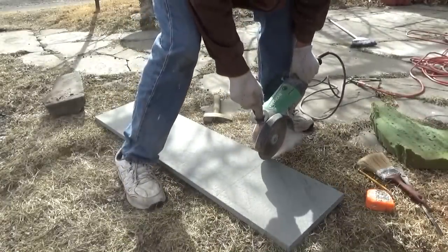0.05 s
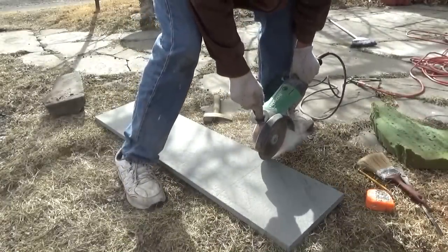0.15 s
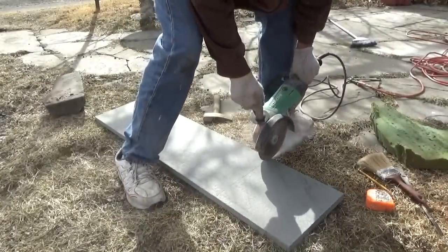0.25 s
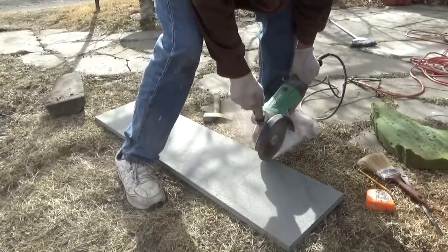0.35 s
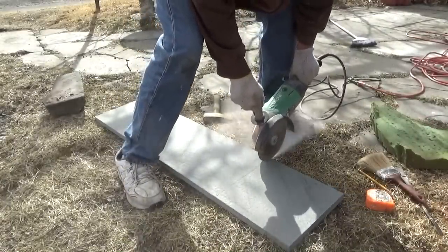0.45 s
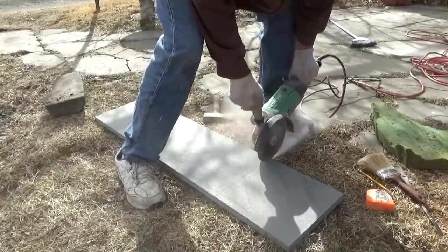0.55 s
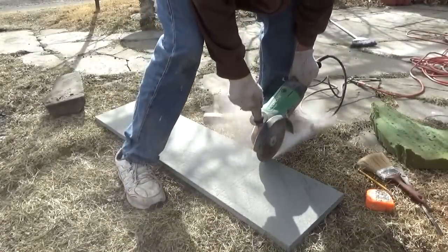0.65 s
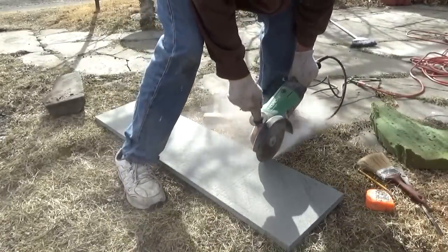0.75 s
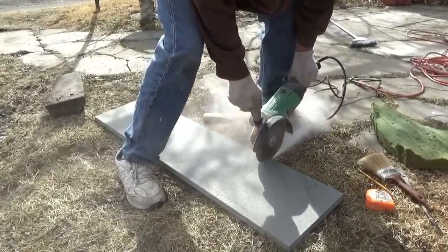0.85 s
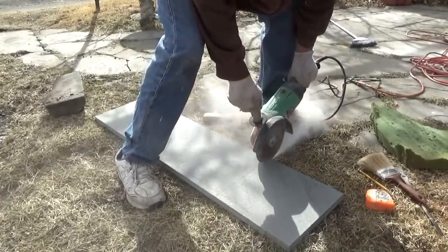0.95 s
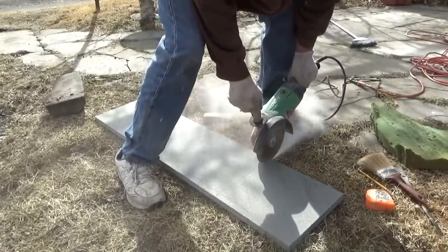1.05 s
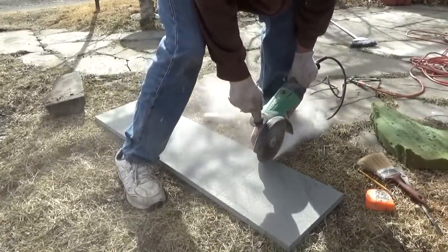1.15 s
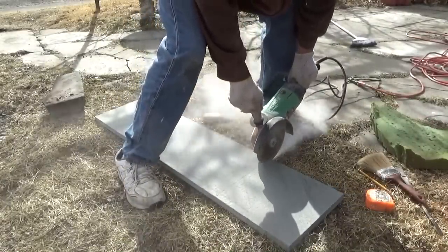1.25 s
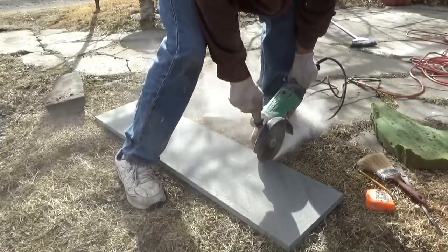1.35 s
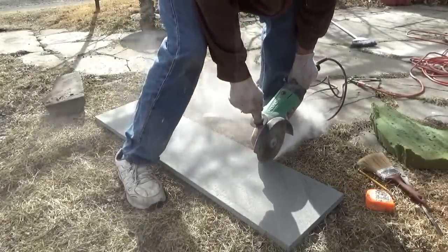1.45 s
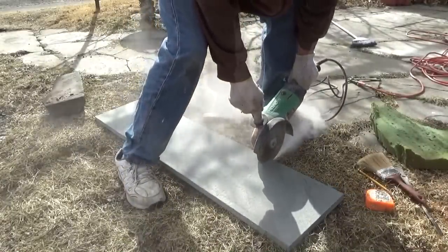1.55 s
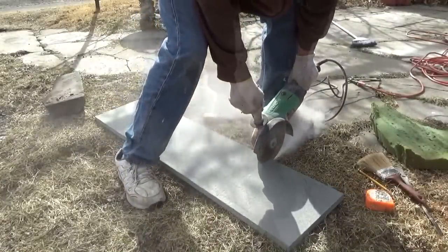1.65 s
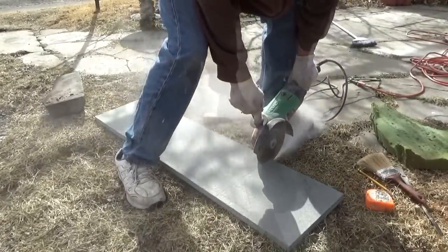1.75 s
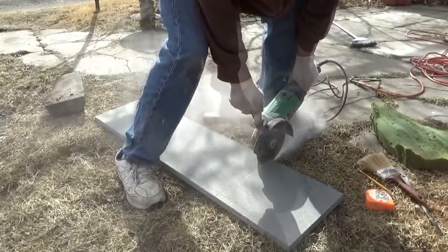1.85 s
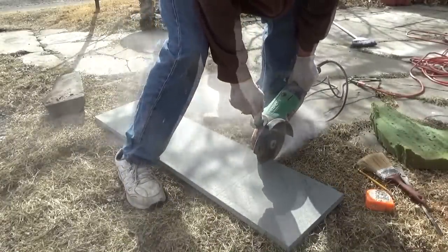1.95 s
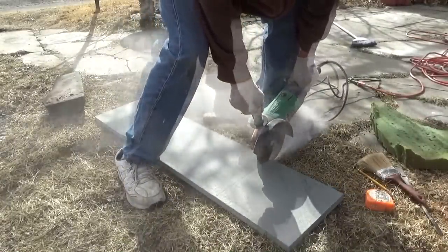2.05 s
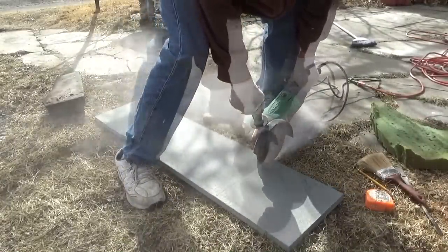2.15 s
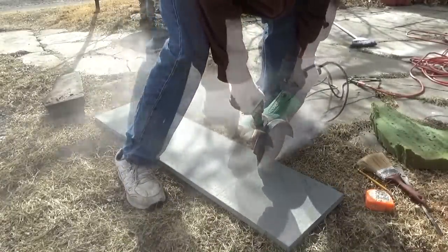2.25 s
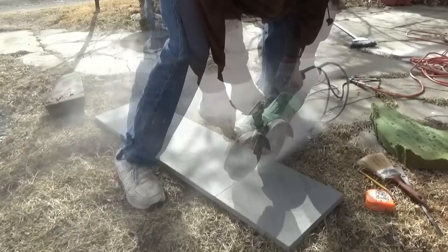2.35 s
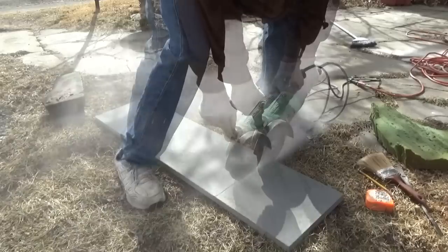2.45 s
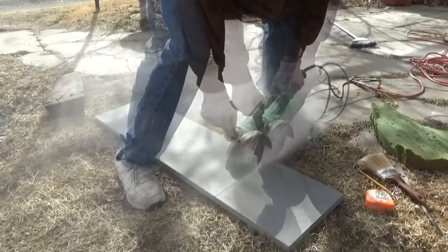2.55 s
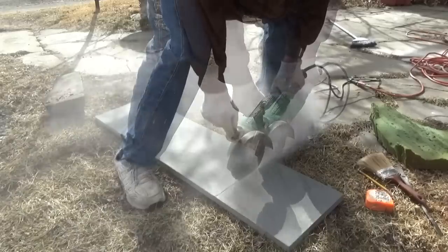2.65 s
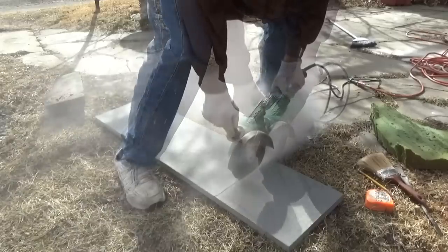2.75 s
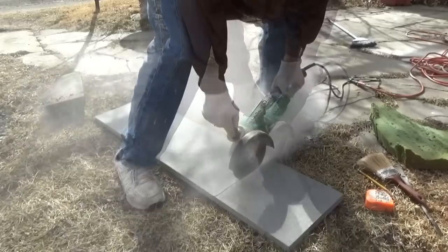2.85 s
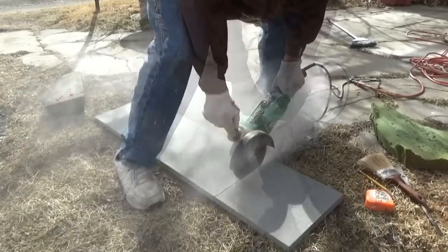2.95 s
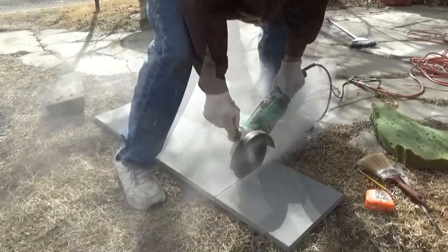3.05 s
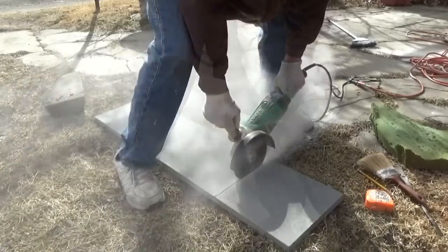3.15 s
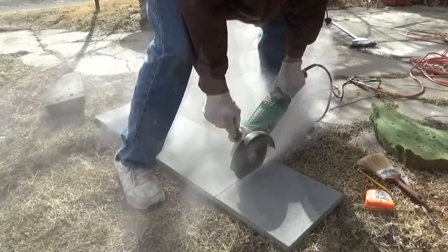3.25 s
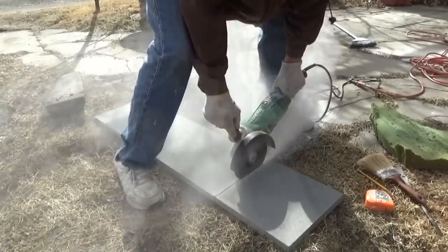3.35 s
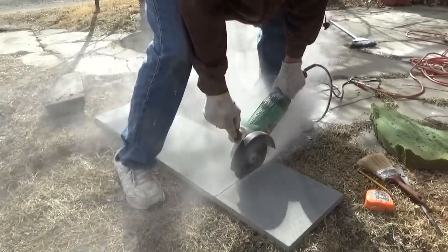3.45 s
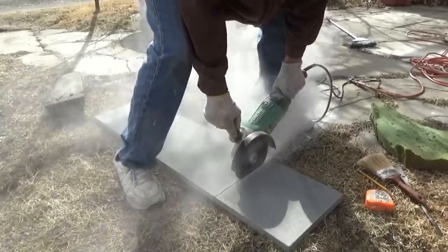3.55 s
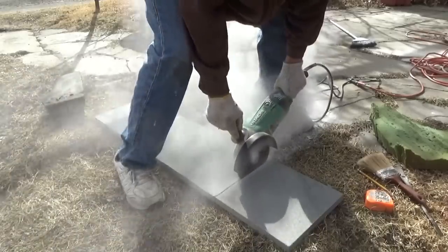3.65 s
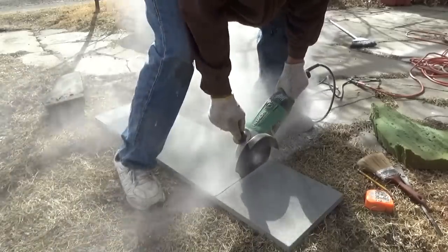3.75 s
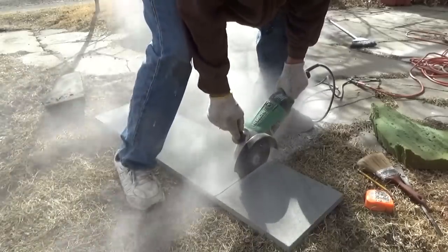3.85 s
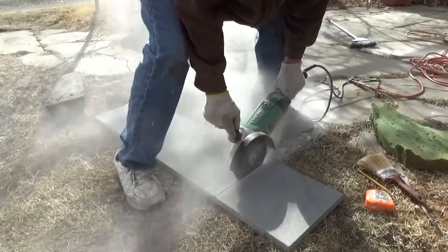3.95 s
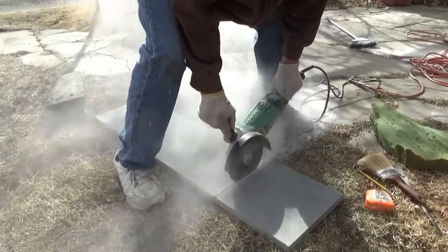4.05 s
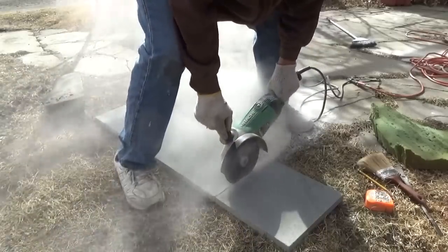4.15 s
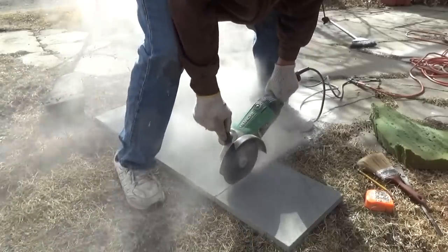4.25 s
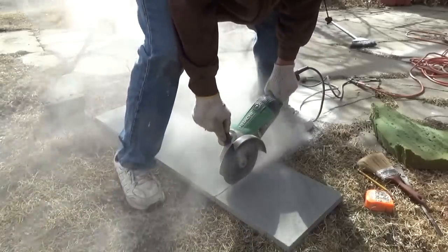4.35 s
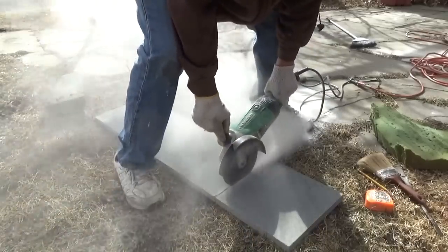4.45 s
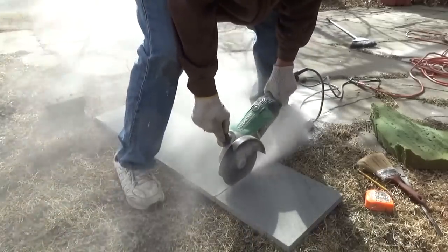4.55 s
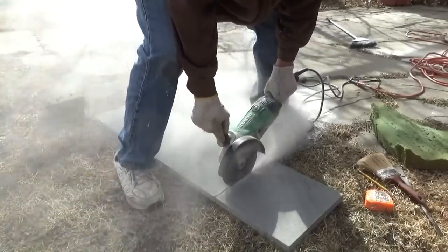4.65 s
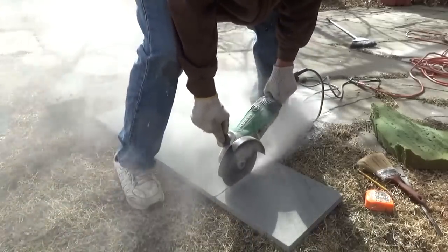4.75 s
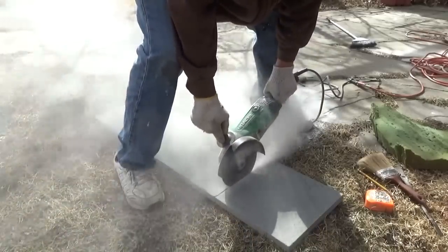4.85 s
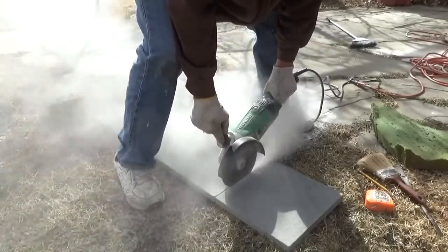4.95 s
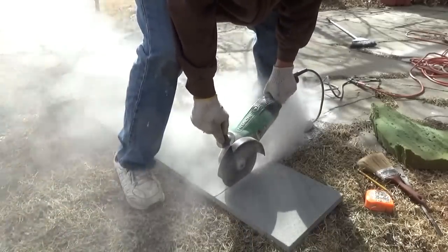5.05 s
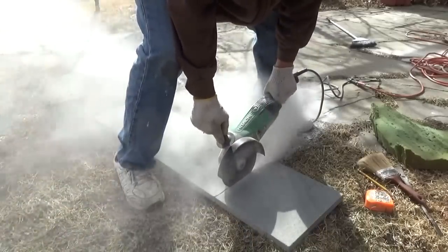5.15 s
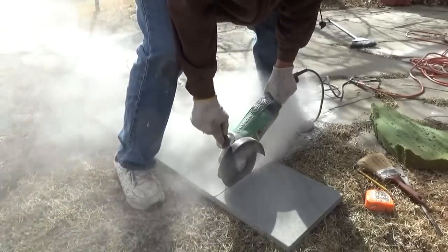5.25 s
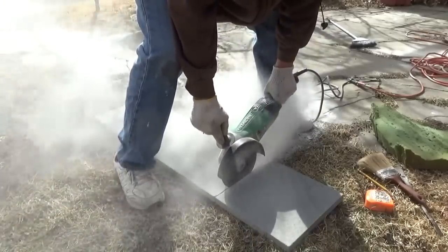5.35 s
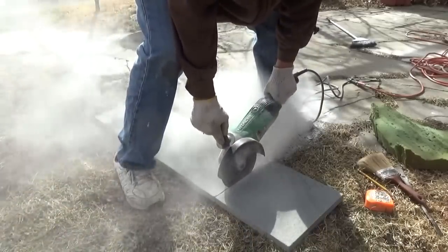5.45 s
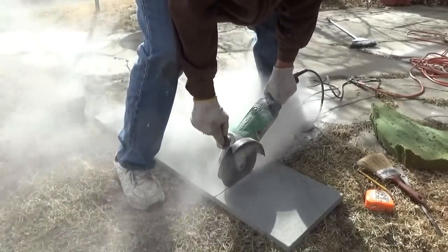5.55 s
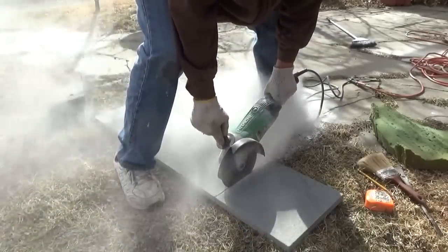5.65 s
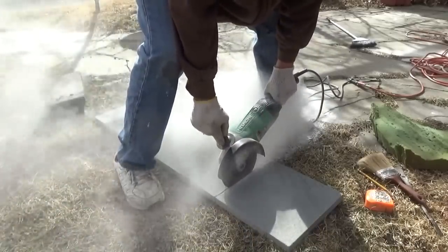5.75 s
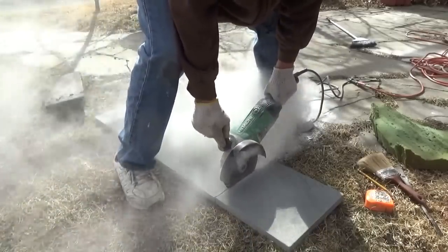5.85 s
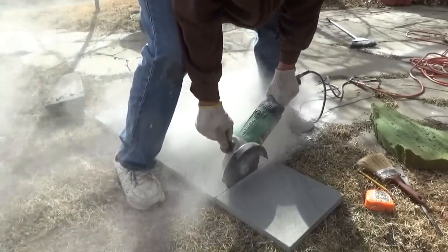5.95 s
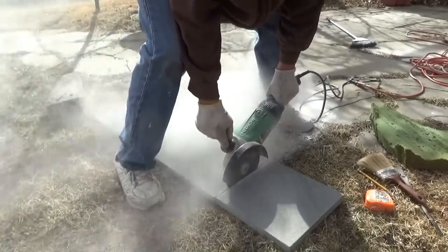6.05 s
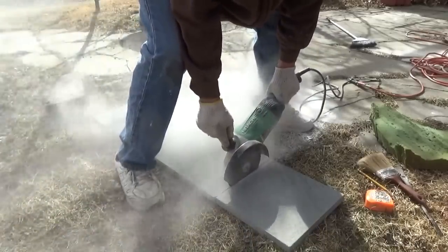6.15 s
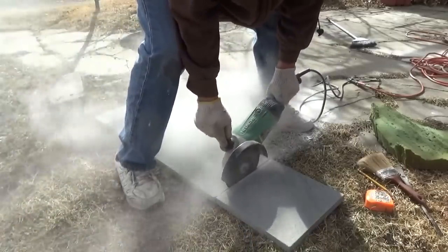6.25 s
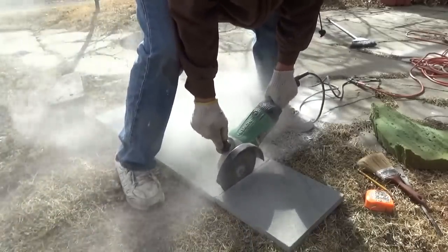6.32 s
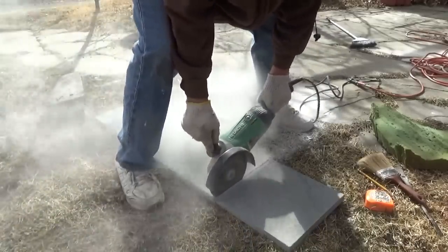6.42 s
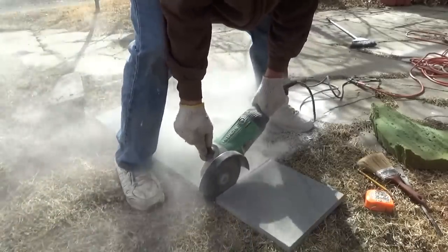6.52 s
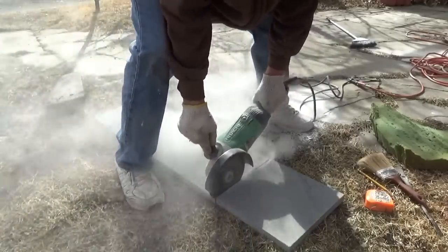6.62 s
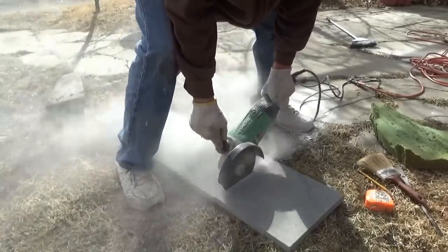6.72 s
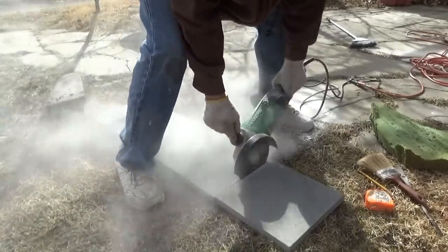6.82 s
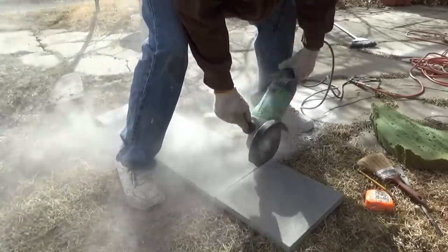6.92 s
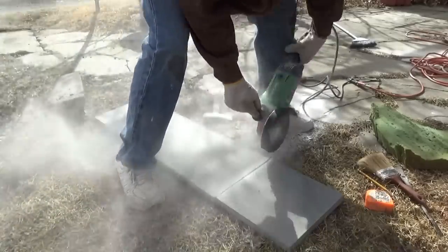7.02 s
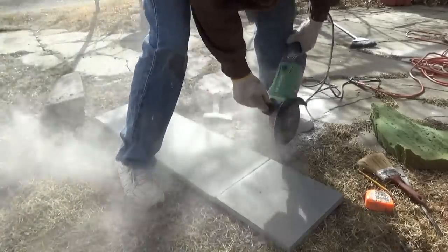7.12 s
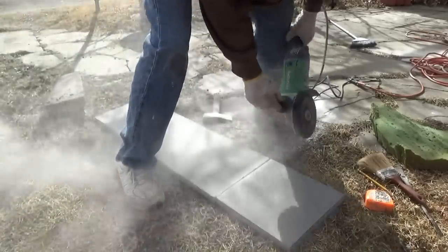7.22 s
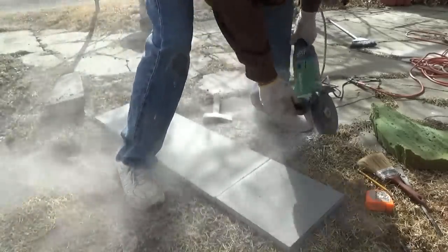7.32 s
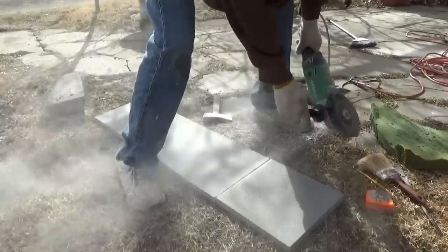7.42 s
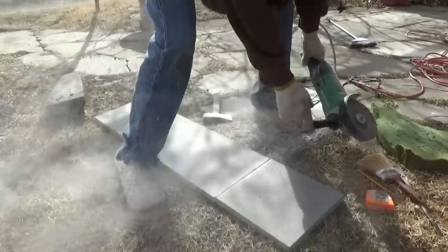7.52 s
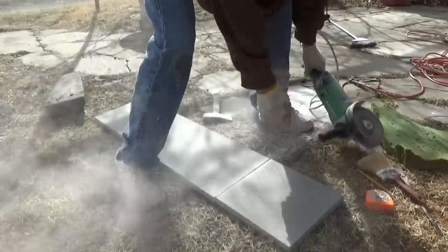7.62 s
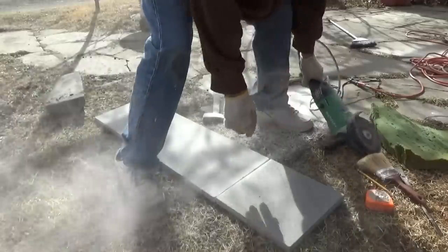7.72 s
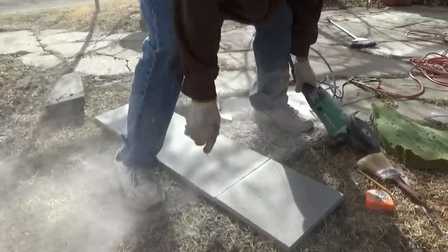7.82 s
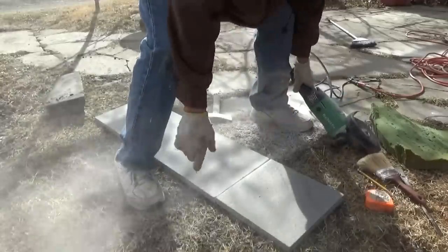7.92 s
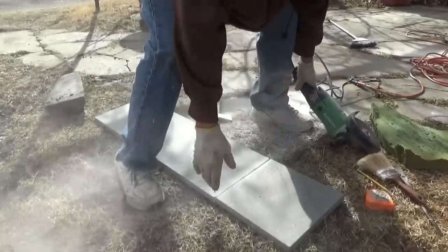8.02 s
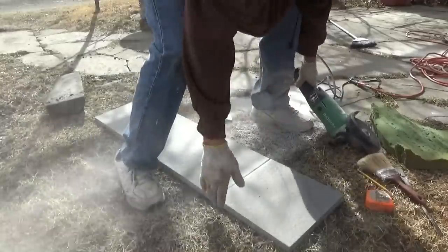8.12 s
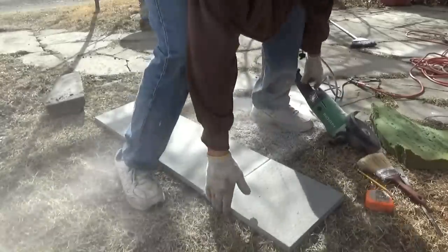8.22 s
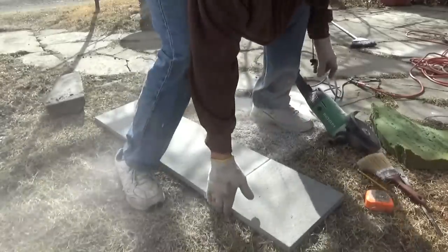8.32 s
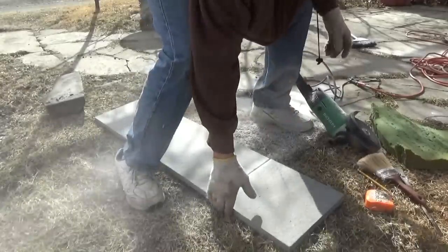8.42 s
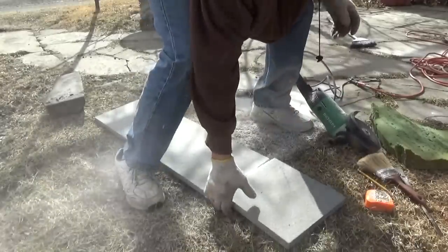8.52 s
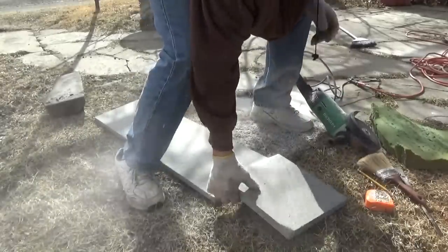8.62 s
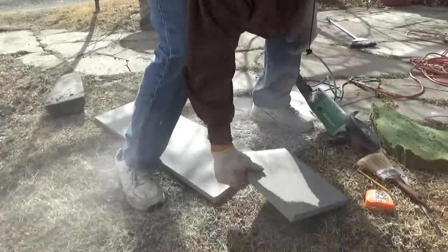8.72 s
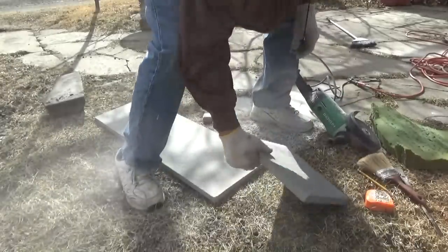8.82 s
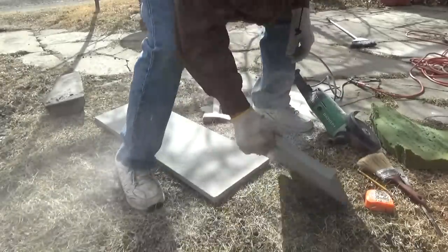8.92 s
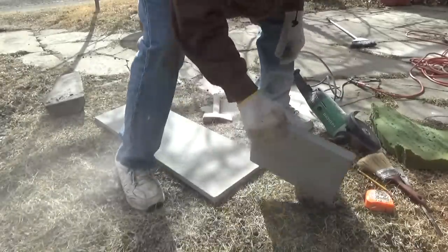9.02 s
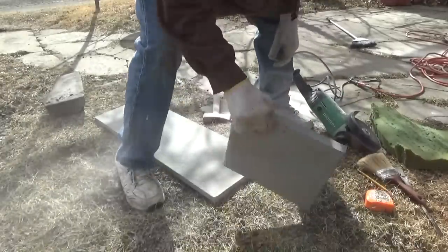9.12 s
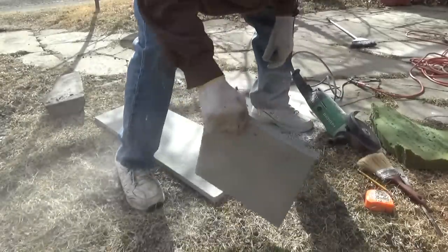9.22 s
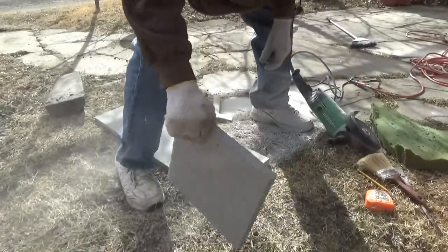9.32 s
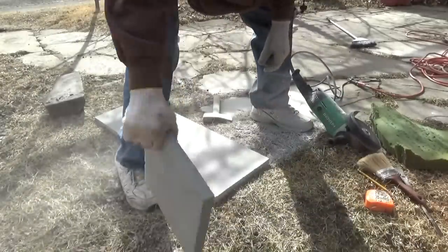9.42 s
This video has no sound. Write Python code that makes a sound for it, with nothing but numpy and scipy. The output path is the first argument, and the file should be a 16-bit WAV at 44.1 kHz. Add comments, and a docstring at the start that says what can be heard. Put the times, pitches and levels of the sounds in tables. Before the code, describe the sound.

An angle grinder cuts stone outdoors, very close to a small overloaded microphone. The steel disc screeches harshly over a gritty, droning grind as the motor is dragged lower. Brief lighter touches follow near the end of the cut, then the disc lifts out, ringing briefly. The motor coasts down with faint whines, ticks and scrapes on grass, while a distant engine hum rises.

```python
"""Angle grinder cutting stone

An angle grinder, pushed in several times, cuts a stone slab outdoors, close to a small overloaded microphone.
Grit and rim bumps excite the steel disc, whose modes broaden in the slot, and the slab; load drags the motor
down. Once through, the disc speeds up, lifts out and coasts with ringing, faint whines, ticks and scrapes on
grass. Filtered noise makes the air and fan; a few sines make a far engine hum; air and hum come up once the
motor is off."""
import sys
import numpy as np
from scipy import signal
from scipy.fft import rfft, irfft, next_fast_len
from scipy.io import wavfile
from scipy.ndimage import uniform_filter1d, map_coordinates

SR = 44100
rng = np.random.default_rng(int(sys.argv[2]) if len(sys.argv) > 2 else 0)


def digitize_waveform(pressure):
    """Quantize a signal to 16-bit integers and store it at the path in sys.argv[1].

    Rows of a 2-D input are taken as channels; values are limited to [-1, 1].
    """
    field = np.atleast_2d(pressure).T
    bounded = np.clip(field, -1, 1)
    quanta = np.round(bounded * 32767).astype(np.int16)
    wavfile.write(sys.argv[1], SR, quanta)


N = 418068

# left-right likeness of the noise in the cut and in the background: [f/Hz, coherence]
CUT_COHERENCE = [(60, .95), (250, .72), (650, .35), (1200, .74), (1600, .94), (2500, .992), (4500, .987),
                 (6500, .985), (9000, .994), (13000, .997)]
BACKGROUND_COHERENCE = [(200, 1), (1500, .98), (10000, .98)]

# motor: through the stone it recovers, switched off it coasts (time constants RECOVER_S, COAST_S)
THROUGH_S, RECOVERED_HZ, RECOVER_S, OFF_S, COAST_S = 5.9, 80, .33, 7, 5
# disc leaves the stone: scraping thins out before LIFT_S, then stops
LIFT_S, THIN_S, THIN_DB, LEAVE_S = 7.032, .25, 6.5, .025


def amp(db):
    """Decibels to gain."""
    return 10 ** (np.asarray(db) / 20)


def unit(x):
    """Scale to rms 1."""
    return x / np.sqrt(np.mean(x ** 2) + 1e-20)


def along(points, hz):
    """Interpolate (Hz, value) points on a log frequency axis."""
    f, v = np.transpose(points)
    return np.interp(np.log(hz + 1), np.log(f + 1), v)


def curves(rows):
    """One value per sample for each column after the time."""
    s, *cols = np.transpose(rows)
    return [np.interp(np.arange(N) / SR, s, c) for c in cols]


def wobble(rate_hz):
    """Smooth random curve, rate_hz knots a second."""
    knots = rng.standard_normal(int(N * rate_hz / SR) + 4)
    coarse = np.arange(0, N, 32)
    smooth = map_coordinates(knots, [coarse * rate_hz / SR], mode="nearest")
    return np.interp(np.arange(N), coarse, smooth)


def since(start_s):
    """Seconds since a moment, 0 before it."""
    return np.maximum(np.arange(N) / SR - start_s, 0)


def ramp(middle_s, length_s):
    """Straight rise from 0 to 1 around a moment."""
    return np.clip(.5 + (np.arange(N) / SR - middle_s) / length_s, 0, 1)


def held(start_s, end_s, attack_s, release_s):
    """Attack, hold at 1, release."""
    return ramp(start_s, attack_s) * (1 - ramp(end_s, release_s))


def filtered(x, response):
    """Multiply the spectrum of x by a response of frequency."""
    m = next_fast_len(N + SR // 4)
    return irfft(rfft(x, m) * response(np.fft.rfftfreq(m, 1 / SR)), m)[..., :N]


def below(hz, edge_hz):
    """Steep low-pass gain."""
    return 1 / np.sqrt(1 + (hz / edge_hz) ** 24)


def above(hz, edge_hz):
    """Steep high-pass gain."""
    return np.sqrt(1 - below(hz, edge_hz) ** 2)


def resonance(modes, hz):
    """Summed power gain of resonances."""
    return sum(amp(db) ** 2 / (1 + (2 * (hz - centre) / width) ** 2) for centre, width, db in modes)


def noise(coherence):
    """White stereo noise with a given likeness of the channels."""
    def mix(hz):
        turn = np.arccos(np.clip(along(coherence, hz), -1, 1)) / 2
        return np.array([np.cos(turn), np.sin(turn)])
    mid, side = filtered(rng.standard_normal((2, N)), mix)
    return np.array([mid + side, mid - side])


def coloured(x, spectrum):
    """x through a spectrum, at rms 1."""
    return unit(filtered(x, lambda hz: amp(along(spectrum, hz))))


def motor():
    """Turns per second: dragged down by the cut, recovering once through, coasting when off."""
    # disc speed under load: [t/s, speed/Hz]
    load_speed = [(0, 90.6), (.22, 88.9), (.45, 84.7), (1.01, 70.4), (1.37, 64), (1.63, 61.3), (1.94, 59.2),
                  (2.68, 55.2), (2.9, 52.2), (3.36, 52), (3.68, 50.7), (3.92, 57.5), (4.1, 57.6),
                  (4.26, 56.2), (4.56, 52.2), (4.67, 51.4), (5.05, 52.1), (5.28, 51.7), (5.57, 49.2),
                  (5.9, 47.5)]
    loaded_hz, = curves(load_speed)
    driven_hz = RECOVERED_HZ + (loaded_hz - RECOVERED_HZ) * np.exp(-since(THROUGH_S) / RECOVER_S)
    return driven_hz * np.exp(-since(OFF_S) / COAST_S)


def outdoors():
    """Air noise and summed engine sines, both wavering and coming up once the motor is off."""
    # air spectrum: [f/Hz, relative level/dB per Hz]
    air_spectrum = [(24, -28), (50, -22), (90, -15), (270, -12), (660, -0.5), (850, -7), (1460, -3),
                    (1920, -5), (3500, -4), (7500, -15), (10000, -13.5), (12500, -28), (15000, -45)]
    # engine partials: [f/Hz, relative level/dB]
    engine_partials = [(75.2, 2), (100.2, 0), (127, -2), (150.3, -4), (175.5, -8)]
    t, after = np.arange(N) / SR, since(OFF_S)
    rise_s = 1.2
    air_db = -34.2 - 10 * np.exp(-after / rise_s) + 1.2 * wobble(6.6)
    engine_db = -67.5 + 7.2 * after
    hum = unit(sum(amp(db + 1.5 * wobble(3)) * np.sin(2 * np.pi * hz * t + .4 * wobble(4.3))
                   for hz, db in engine_partials))
    return amp(air_db) * coloured(noise(BACKGROUND_COHERENCE), air_spectrum) + amp(engine_db) * hum


def fan_and_whines(speed_hz, angle, whine_db):
    """Fan noise grows with a power of speed; each whine swells and fades around its own listed moment."""
    # fan spectrum: [f/Hz, relative level/dB per Hz]
    fan_spectrum = [(900, -31), (1700, -4), (3400, -2.5), (5500, -10.5), (9500, -16.5), (13000, -30)]
    # gear and commutator: [multiple of disc speed, level before whine_db/dB, loudest t/s, swell/s]
    whine_orders = [(23.2, -49, 7.9, .25), (43.2, -40, 7, .36), (89, -52, 7.43, .1), (88, -50, 8.22, .16),
                    (124, -51, 7.3, .25), (124, -50, 8.15, .33), (148, -50, 8, .27), (246, -66, 9.2, .3)]
    t, whines = np.arange(N) / SR, 0
    for order, db, loudest_s, swell_s in whine_orders:
        swell = 1 / (1 + ((t - loudest_s) / swell_s) ** 4)
        tone = np.sin(order * angle + 1.2 * wobble(150))
        whines = whines + amp(db + whine_db + 2.8 * wobble(14)) * swell * tone
    # laid on the grass at 7.75 s, the grinder is muffled
    fan_db = -33.5 - 3.8 * ramp(7.75, length_s=.2)
    fan = amp(fan_db) * (speed_hz / RECOVERED_HZ) ** 3.5
    return whines + fan * coloured(noise(BACKGROUND_COHERENCE), fan_spectrum)


def pushing():
    """Force on the disc, and its shares running free, buried, in a groove and skimming."""
    # pushes: [start t/s, end t/s, force, sinking depth 0-1]
    pushes = [(.1, .43, .46, .3), (.43, 3.7, .92, .97), (3.7, 3.9, .45, .35), (3.9, 5.945, .98, 1),
              (5.945, 6.02, .55, .2), (6.345, 6.51, 1.25, .65), (6.51, 6.66, .42, .12),
              (6.66, 6.805, 1.02, .45), (6.88, 6.95, .3, 0)]
    push_s, ease_s, sink_s = .07, .08, .09
    force, sunk = 0, 0
    for start_s, end_s, strength, depth in pushes:
        push = held(start_s, end_s, push_s, ease_s)
        force = force + strength * push
        sunk = sunk + depth * push * (1 - np.exp(-since(start_s) / sink_s))
    # the scratch deepens to a groove, then buries the rim
    groove, deep = ramp(1, length_s=.8), ramp(2.47, length_s=.55)
    return force, np.array([deep * (1 - sunk), deep * sunk, groove - deep, 1 - groove])


def rim(speed_hz, angle, smear_rad, life_s, count):
    """The same rim bumps strike every turn, wearing into new ones; as strong per Hz as white noise."""
    size = count * 16
    age = np.arange(N) / SR / life_s
    bumps = signal.resample(rng.standard_normal((int(age[-1]) + 2, 2 * count)), size, axis=1)
    place = ((angle + smear_rad * wobble(30)) / (2 * np.pi) * size).astype(int) % size
    stage, wear = age.astype(int), age % 1 * np.pi / 2
    # equal-power fade from one set of bumps to the next
    worn = np.cos(wear) * bumps[stage, place] + np.sin(wear) * bumps[stage + 1, place]
    return worn * np.sqrt(2 * count * speed_hz / SR)


def contact(angle, throb_db, chatter_db):
    """Pressure on the stone: the rim runs slightly out of true and chatters."""
    throb = throb_db * np.cos(angle + wobble(2.92))
    return unit(amp(throb + chatter_db * wobble(260) + 0.3 * wobble(22)))


def droning(angle, grip, count):
    """Rim harmonics sag through the cut's resonances: each swells and hands over to the next."""
    # slab and disc resonances by cut depth: [f/Hz, width/Hz, harmonic level before drone gain/dB]
    shallow_modes = [(370, 50, -48.5), (565, 45, -45), (808, 32, -41), (1050, 55, -43), (1228, 45, -41),
                     (1615, 40, -36)]
    deep_modes = [(395, 45, -51), (670, 40, -48), (1140, 60, -44.5), (1465, 40, -41), (1800, 40, -38)]
    size = count * 64
    # one turn of equal harmonics at random phases
    turn = unit(irfft(np.r_[0, np.exp(2j * np.pi * rng.random(count))], size)) * np.sqrt(count)
    turns = (angle + .015 * wobble(25)) / (2 * np.pi)
    knocks = np.interp(turns % 1, np.arange(size) / size, turn)
    deep = filtered(knocks, lambda hz: np.sqrt(resonance(deep_modes, hz)))
    shallow = filtered(knocks, lambda hz: np.sqrt(resonance(shallow_modes, hz)))
    _, buried, grooved, skimming = grip
    return buried * deep + (grooved + skimming) * shallow


def steel_gain(modes, hz):
    """Spectrum of grit ringing a set of disc modes."""
    # grit: [f/Hz, relative level/dB per Hz]
    grit_spectrum = [(1300, -16), (2400, -13.5), (4200, -5), (5200, 0.5), (10500, 1.5), (12500, -8.5),
                     (15400, -12)]
    return amp(along(grit_spectrum, hz)) * np.sqrt(1 + resonance(modes, hz)) * above(hz, 1430)


def spinning(modes, bend):
    """Waves run round the disc: its spin bends their pitch, here by reading noise at varying speed."""
    waves = filtered(noise(CUT_COHERENCE), lambda hz: steel_gain(modes, hz))
    place = np.cumsum(1 + bend) % (N - 1)
    return np.array([map_coordinates(side, [place], order=3, mode="nearest") for side in waves])


def disc(grit, speed_hz, grip, howl_db, screech_db, split_hz):
    """Grit rings the disc; the slot's grip blends one set of modes into the next."""
    # disc modes, free (waves with and against the spin), then by grip: [f/Hz, width/Hz, level over grit/dB]
    forward_modes = [(3030, 36, 37), (4020, 45, 25), (4810, 80, 29), (5260, 90, 29.5), (6300, 70, 22),
                     (6550, 80, 26), (7640, 45, 24), (7960, 70, 25), (9270, 70, 21), (9580, 120, 22),
                     (10160, 70, 26), (10480, 170, 21), (11250, 90, 26), (13700, 700, 19)]
    backward_modes = [(1700, 100, 34), (2040, 60, 30.5), (2320, 25, 30), (2660, 40, 34), (3520, 45, 31),
                      (5830, 110, 24), (7150, 70, 24), (8600, 80, 23), (11060, 90, 24), (11930, 120, 23),
                      (12380, 160, 23)]
    buried_modes = [(1467, 38, 28), (1787, 40, 23), (1900, 320, 15), (2656, 78, 20), (2926, 210, 17.5),
                    (3510, 95, 14.7), (4020, 260, 14.4), (4705, 140, 19.9), (5260, 160, 18.2),
                    (5895, 220, 15.3), (6370, 200, 21.3), (7200, 220, 18), (7730, 400, 19), (8600, 353, 9),
                    (9465, 453, 15.2), (10490, 670, 16), (11030, 320, 16), (11984, 173, 23.5),
                    (12680, 240, 19.7), (12700, 205, 16), (13700, 430, 17), (14600, 260, 18)]
    groove_modes = [(1592, 84, 28.5), (2140, 46, 20.3), (2581, 100, 20), (2956, 75, 23.4),
                    (3827, 300, 17.5), (4710, 70, 23), (5361, 450, 18), (6450, 549, 18.5),
                    (7680, 470, 15.5), (8540, 37, 21.4), (9247, 66, 20.7), (9780, 630, 17.4),
                    (10850, 600, 16.8), (12130, 260, 24), (13400, 110, 11), (14000, 600, 16)]
    skim_modes = [(1565, 49, 23.6), (2223, 31, 16), (2450, 38, 10), (3600, 600, 9.6), (4060, 42, 21.5),
                  (4640, 190, 15), (5306, 190, 14.5), (5795, 48, 21.3), (6630, 110, 20.2), (6940, 37, 19),
                  (7710, 43, 17.5), (9980, 360, 11.6), (10650, 25, 12.4), (11542, 290, 13), (12483, 81, 14),
                  (13100, 117, 8)]
    # pitch share: .0011 per turn/s away from the listed modes' 64.5 turns/s, plus random waver
    bend = .0011 * (speed_hz - 64.5) + .002 * wobble(14)
    ring = grip[0] * unit(spinning(forward_modes, bend) + spinning(backward_modes, -bend))
    for share, modes in zip(grip[1:], [buried_modes, groove_modes, skim_modes]):
        ring = ring + share * unit(filtered(grit, lambda hz: steel_gain(modes, hz)))

    def steady(x):
        power = uniform_filter1d(np.mean(x ** 2, axis=0), SR // 6)
        return x / np.sqrt(abs(power) + 1e-12)

    howl = steady(filtered(ring, lambda hz: below(hz, split_hz) ** 2))
    screech = steady(filtered(ring, lambda hz: above(hz, split_hz) ** 2))
    return amp(howl_db) * howl + amp(screech_db) * screech


def singing():
    """Rubbing feeds one narrow resonance, which stands out and slides: noise-modulated carrier."""
    # songs: [start t/s, end t/s, start f/Hz, end f/Hz, level/dB]
    songs = [(.1, .4, 5390, 5390, -22), (1.95, 2.38, 1650, 1615, -24), (2.02, 2.35, 4790, 4740, -22),
             (2.9, 4.05, 9450, 9450, -24), (3.61, 3.72, 1810, 1850, -29), (3.68, 3.85, 4770, 4920, -22),
             (3.85, 4.12, 4900, 4730, -23), (4.17, 4.9, 1790, 1810, -29), (5.55, 5.92, 690, 668, -42),
             (6.48, 6.82, 1810, 1790, -26), (6.79, 6.98, 5290, 5330, -16), (6.88, 7.01, 1660, 1680, -28)]
    q, fade_s = 40, .1
    out = np.zeros(N)
    for start_s, end_s, start_hz, end_hz, db in songs:
        swell = held(start_s, end_s, fade_s, fade_s)
        on = np.flatnonzero(swell)
        hz = np.interp(on / SR, [start_s, end_s], [start_hz, end_hz])
        phase = 2 * np.pi * np.cumsum(hz) / SR
        pole = np.exp(-np.pi * start_hz / q / SR)
        flutter = signal.lfilter([1], [1, -pole], rng.standard_normal((2, len(on))))
        tone = unit(flutter[0] * np.cos(phase) + flutter[1] * np.sin(phase))
        out[on] += amp(db) * swell[on] * tone
    return out


def cutting(speed_hz, angle):
    """Loose grit and the repeating rim drive slab and disc, louder with force."""
    # levels at no force; rows free, buried, groove, skim: [howl of lowest modes/dB, screech/dB]
    ring_levels = [(-24.5, -11.7), (-24.6, -11.45), (-26.4, -12.4), (-25.5, -11.8)]
    # slab grinding: [f/Hz, relative level/dB per Hz]
    grind_spectrum = [(15, -41), (40, -27), (150, -8), (500, -5), (900, -4.5), (1300, 0), (1500, -50.5),
                      (2000, -60)]
    force, grip = pushing()
    howl_db, screech_db = np.transpose(ring_levels) @ grip
    # a shallow cut repeats more cleanly than a deep one; power share per grip
    repeating = np.array([.12, .38, .62, .52]) @ grip

    # the finest grit is new at every turn
    def coarse(hz):
        return 1 / (1 + (hz / 6000) ** 4)

    loose = noise(CUT_COHERENCE)
    bumps = filtered(rim(speed_hz, angle, smear_rad=.01, life_s=.22, count=200), coarse)
    grit = loose - (1 - np.sqrt(1 - repeating)) * filtered(loose, coarse) + np.sqrt(repeating) * bumps
    pressure = contact(angle, throb_db=-0.1, chatter_db=1)
    slab = amp(-42.5 + 9.5 * force) * coloured(loose * pressure, grind_spectrum)
    drone = amp(-3 + 6 * force + 2 * wobble(5)) * droning(angle, grip, count=40)
    steel = disc(grit * pressure, speed_hz, grip, howl_db + .3 * force, screech_db + 4.4 * force,
                 split_hz=2380)
    thinning_db = -THIN_DB * np.minimum(since(LIFT_S - THIN_S) / THIN_S, 1)
    leaving = (1 - ramp(LIFT_S, LEAVE_S)) * amp(thinning_db)
    return leaving * (slab + drone + steel + singing())


def ring_out(start_s, t60_s):
    """Lifted from the stone, the disc's low modes ring on as decaying sines."""
    t = since(start_s)
    modes = [(2295, -28), (3055, -30), (3450, -26)]  # [f/Hz, level/dB]
    tones = sum(amp(db) * np.sin(2 * np.pi * hz * t + .5 * wobble(39)) for hz, db in modes)
    return tones * amp(-60 * t / t60_s) * (1 - np.exp(-t / 0.0086))


def ticks(level_db, scrape_db, scrape_t60_s, attack_s):
    """Light, slightly scraping contacts ring the steel: decaying sines and noise."""
    # ticks of the coasting disc: [t/s, level before level_db/dB]
    tick_times = [(7.0808, -20), (7.2799, -26), (7.3494, -30), (7.44, -29), (7.5328, -27), (7.6131, -30),
                  (7.8002, -32), (7.8705, -29), (8.3564, -30), (8.5714, -31), (8.6832, -28), (8.8433, -31),
                  (8.9121, -32), (9.0219, -31), (9.2289, -31), (9.275, -33), (9.325, -33)]
    # their ring: [f/Hz, relative level/dB, t60/s]
    steel_ring = [(2920, -6.5, 0.073), (4850, -7, 0.06), (8640, -8, 0.063), (9430, -6.5, 0.065),
                  (9630, -12, .07), (10300, -17, .05)]
    out, t = np.zeros(N + SR), np.arange(SR // 6) / SR
    for start_s, db in tick_times:
        ring = 0
        for hz, mode_db, t60_s in steel_ring:
            decay = amp(mode_db + rng.normal(0, 2.5) - 60 * t / t60_s)
            ring = ring + decay * np.sin(2 * np.pi * (hz * rng.normal(1, .003) * t + rng.random()))
        scrape = amp(scrape_db - 60 * t / scrape_t60_s) * rng.standard_normal(len(t))
        attack = 1 - np.exp(-t / attack_s)
        out[round(start_s * SR):][:len(t)] += amp(db + level_db) * (ring + scrape) * attack
    return filtered(out[:N], lambda hz: below(hz, 11000))


def handling():
    """Gritty noise scrapes: tool brushes dry grass, then the cut piece is shifted and pulled away."""
    # scrapes: [start t/s, end t/s, centre f/Hz, level/dB]
    scrapes = [(7.66, 7.77, 3400, -45), (7.85, 8.5, 1550, -48), (8.55, 8.95, 1550, -43.5),
               (9.25, 9.47, 1350, -46)]
    # colour: [multiple of centre f, relative level/dB per Hz]
    scrape_colour = [(.03, -35), (.2, -15), (.71, -16), (1, 3), (1.42, -11), (4, -40)]
    crunch_db = 5 * wobble(240)
    out, crunch = 0, rng.standard_normal(N) * amp(crunch_db)
    for start_s, end_s, centre_hz, db in scrapes:
        rub = coloured(crunch, [(multiple * centre_hz, level) for multiple, level in scrape_colour])
        swell = held(start_s, end_s, attack_s=.06, release_s=.12)
        out = out + swell * amp(db + 3.5 * wobble(22)) * rub
    return out


def scene():
    """The cut is straight ahead; all else, with the idle grinder put down there, leans right."""
    speed_hz = motor()
    angle = 2 * np.pi * np.cumsum(speed_hz) / SR
    quiet = outdoors() + fan_and_whines(speed_hz, angle, whine_db=-1)
    quiet = quiet + ring_out(start_s=7, t60_s=.55)
    quiet = quiet + ticks(level_db=-.7, scrape_db=-6, scrape_t60_s=.04, attack_s=0.0011)
    quiet = quiet + handling()
    return cutting(speed_hz, angle) + quiet * amp([[-1.25], [1.1]])


def record(dry):
    """Overload flattens the loudest peaks; nothing passes above the band limit."""
    flattened = dry / (1 + abs(dry / .92) ** 16) ** (1 / 16)
    top_hz = 15700
    return filtered(flattened, lambda hz: hz < top_hz)


dry = scene()
out = record(dry)
digitize_waveform(out)
```